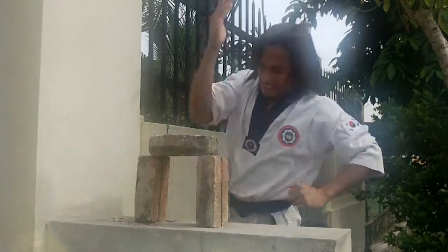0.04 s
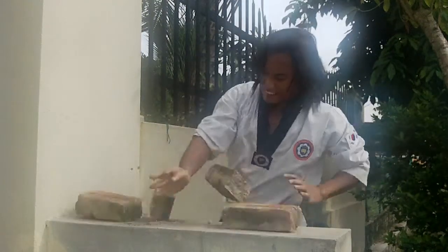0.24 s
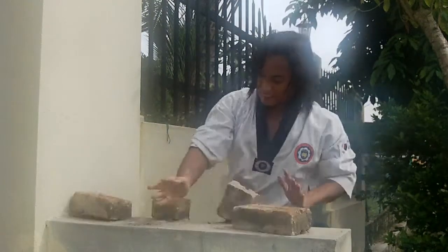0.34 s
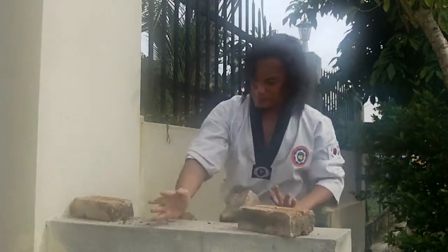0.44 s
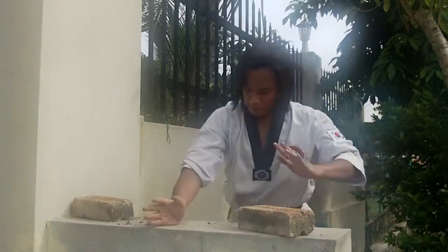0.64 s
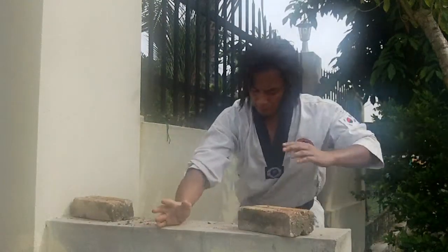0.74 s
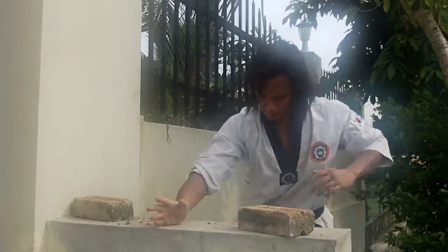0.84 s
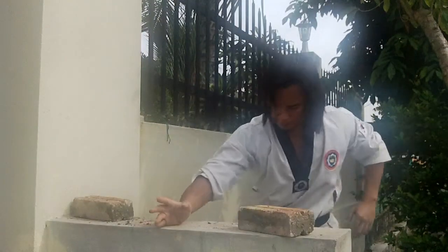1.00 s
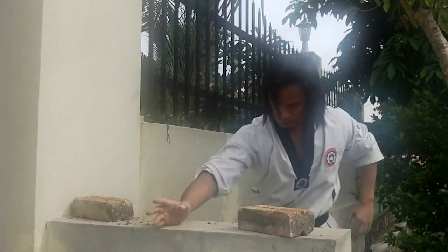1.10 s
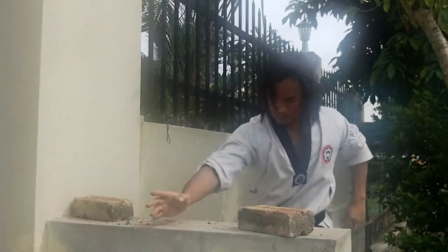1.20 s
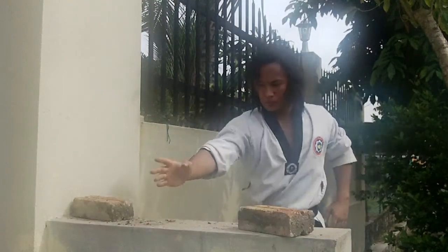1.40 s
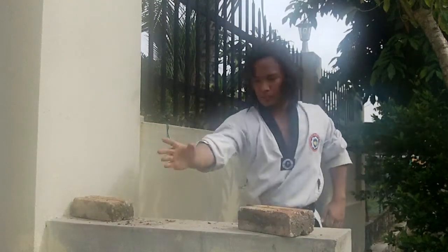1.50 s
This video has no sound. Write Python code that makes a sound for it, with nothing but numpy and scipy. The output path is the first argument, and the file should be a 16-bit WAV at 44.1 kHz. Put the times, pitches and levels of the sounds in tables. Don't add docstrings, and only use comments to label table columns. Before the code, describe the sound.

Bricks break with a dull snap from a hand chop, clink together and slam hard onto a concrete ledge; grit showers, then a piece thuds to the ground, jingling scrap metal, in a quiet yard, close microphone.

```python
import sys
import numpy as np
from scipy import signal
from scipy.fft import rfft, irfft
from scipy.io import wavfile
from scipy.ndimage import map_coordinates

SR = 44100
rng = np.random.default_rng(int(sys.argv[2]) if len(sys.argv) > 2 else 0)


def ratio_of_db(decibels):
    return 10 ** (np.asarray(decibels, float) / 20)


def transcribe(signal):
    frames = np.atleast_2d(signal).T
    limited = np.clip(frames, -1, 1)
    pcm = np.round(limited * 32767).astype(np.int16)
    wavfile.write(sys.argv[1], SR, pcm)


N = 68355


def unit(x):
    return x / np.sqrt(np.mean(x ** 2) + 1e-20)


def along(points, hz):
    f, v = np.transpose(points)
    return np.interp(np.log(hz + 1), np.log(f + 1), v)


def wobble(rate, size=N):
    knots = rng.standard_normal(size // 8 + 9)
    return map_coordinates(knots, [np.arange(size) * min(rate / SR, 1 / 8)])


def noise(points, size=N):
    hz = np.fft.rfftfreq(size, 1 / SR)
    band = (hz > points[0][0] / 2) & (hz < 15900)
    spectrum = rfft(rng.standard_normal(size)) * ratio_of_db(along(points, hz))
    return unit(irfft(spectrum * band, size))


def add(out, s, x):
    i = max(round(s * SR), 0)
    out[i:i + len(x)] += x[:N - i]


# pitch_hz, level_db
CRACK_COLOUR = [(100, 12), (800, -14), (3000, -0.5), (6000, -5), (11000, -9.5), (16000, -34)]
# pitch_hz, level_db
RUBBLE_COLOUR = [(120, -5), (400, 3), (1500, -8.5)]
CRACK_T60_S, RUBBLE_T60_S, RUBBLE_DB = 0.037, 0.11, -17
HARD_RISE_S, SOFT_RISE_S = 0.00055, 0.0025
BLUR_SHARE = 0.12


def struck(modes, hits, rise_s, fastest_blur=140):
    out = np.zeros(N)
    t = np.arange(SR // 4) / SR
    hz, db, t60 = np.transpose(modes)[..., None]
    crumbling = RUBBLE_COLOUR + [(2 * RUBBLE_COLOUR[-1][0], -60)]
    for s, ring_db, crack_db in hits:
        uneven_db = 2 * rng.standard_normal((len(modes), 1))
        wander = np.array([wobble(min(BLUR_SHARE * f, fastest_blur), size=len(t)) for f in hz[:, 0]])
        ring = ratio_of_db(db + uneven_db - 60 * t / t60) * np.sin(2 * np.pi * hz * t + wander)
        crack = ratio_of_db(crack_db - 60 * t / CRACK_T60_S) * noise(CRACK_COLOUR, size=len(t))
        loose = ratio_of_db(RUBBLE_DB - 60 * t / RUBBLE_T60_S) * noise(crumbling, size=len(t))
        press = 1 - np.exp(-t / rise_s)
        add(out, s, ratio_of_db(ring_db) * (ring.sum(0) + loose) * press + crack)
    return out


# pitch_hz, level_db, t60_s
SLAB = [(92.6, -1, 0.18), (227.4, -7, 0.088), (294, 6.5, 0.04), (377, 5, 0.036), (550, 2.5, 0.028),
        (700, 2, 0.025), (1167, -7, 0.071), (1315, -9.5, 0.076), (2300, -4, 0.0036)]
# start_s, ring_db, crack_db
CHOP = [
    (.1445, -11, -11),
]


def chop():
    return struck(SLAB, CHOP, SOFT_RISE_S)


# pitch_hz, level_db, t60_s
HALF = [(1356, -8.5, 0.037), (3128, 1.5, 0.051), (3115, -17, 0.2), (5170, -4, 0.037)]
OTHER_HALF = [(356, -4, 0.029), (810, -19, .03), (1314, -3.5, 0.0076), (2753, 4.5, .025), (2860, -15, 0.16),
              (3040, 2.5, 0.014)]
# start_s, ring_db, crack_db
HALF_HITS = [(.187, -11, -20), (0.2391, -41, -37.5), (0.344, -24, -38.5), (.426, -30.5, -50),
             (.478, -24.5, -28.5)]
OTHER_HITS = [(0.2690, -25, -31.5), (0.2730, -13, -24.5), (0.3409, -9.5, -29), (0.391, -35.5, -61),
              (0.4632, -27, -26)]


def halves():
    return struck(HALF, HALF_HITS, HARD_RISE_S) + struck(OTHER_HALF, OTHER_HITS, HARD_RISE_S)


# pitch_hz, level_db, t60_s
UPRIGHT = [(250, -11, 0.055), (502, -17, 0.095), (713, 1.5, 0.029), (995, -2.5, 0.015), (1175, -7, 0.03),
           (1353, 3.5, 0.028), (1425, -6, 0.028), (2299, -8.5, 0.028), (3124, -2.5, 0.041)]
UPRIGHT_EDGE = [(2700, -7.5, .03), (3105, 0.5, .035), (3168, -3.5, .04), (3843, -4, 0.053)]
UPRIGHT_FACE = [(269, -12, 0.0268), (425, 2.5, 0.02), (657, 0.5, 0.023), (739, -0.5, 0.015),
                (802.6, -5.5, 0.051), (991, -6.5, 0.013), (1624, -16, .02), (2550, -8, .015)]
# start_s, ring_db, crack_db
UPRIGHT_HITS = [(0.3192, -6, -20), (.320, 0.5, -9.5), (.328, -3, -40), (0.343, -11.5, -41),
                (0.354, -23, -39.5), (0.377, -29.5, -43.5), (0.297, -31.5, -50)]
EDGE_HITS = [
    (0.325, -3, -12.5),
]
FACE_HITS = [(0.334, -0.5, -25), (.3405, -8, -29), (.351, -31, -49), (.362, -32, -31.5), (.433, -22, -42),
             (.4412, -15, -37), (.453, -22.5, -58)]


def upright():
    body = struck(UPRIGHT, UPRIGHT_HITS, HARD_RISE_S)
    edge = struck(UPRIGHT_EDGE, EDGE_HITS, HARD_RISE_S)
    face = struck(UPRIGHT_FACE, FACE_HITS, HARD_RISE_S)
    return body + edge + face


# pitch_hz, level_db, t60_s
KERB = [(67, -9.5, 0.23), (125.4, -2, 0.24), (191.2, -11.5, 0.24), (436, -3.5, 0.029), (677, 0, 0.05),
        (801, 0, .03), (1063, -5, 0.021), (1311, -3.5, 0.089), (1845, -13, 0.023), (2820, -14, 0.019)]
GROUND = [(86.6, -8.5, 0.25), (140.2, -6.5, 0.1), (186.8, -10.5, 0.14), (281, -3.5, 0.062),
          (410, 4.5, 0.024), (498, -5, 0.04), (668, -10.5, 0.024), (810, -13.5, 0.024), (1278, -18, 0.051)]
TUMBLING = [(98, -5, .15), (146, -6.5, 0.16), (267, -2, 0.078), (424.5, 1.5, 0.043), (522, -1, 0.013),
            (720, -2, 0.021), (880, -8, .03), (1310, -17.5, 0.042)]
LEDGE = [(70, -12, 0.1), (103.5, 6, 0.42)]
# start_s, ring_db, crack_db
KERB_HITS = [(0.853, -20, -55), (0.856, -15.5, -34), (0.883, -32, -52), (1.539, -34, -53)]
GROUND_HITS = [(.417, -26, -24.5), (0.424, -20.5, -44.5), (0.431, -25, -47.5), (0.467, -20.5, -60),
               (0.488, -31, -58), (0.511, -39.5, -64), (0.995, -16, -46), (1.0, -16.5, -23.5),
               (1.021, -23.5, -40), (1.042, -29.5, -61), (1.09, -35, -46.5)]
TUMBLING_HITS = [(1.174, -32, -67), (1.225, -28.5, -48), (1.243, -35, -47.5), (1.263, -31.5, -61),
                 (1.272, -21.5, -64), (1.296, -21, -55), (1.304, -29, -67), (1.313, -28, -60),
                 (1.325, -30, -49), (1.349, -39.5, -61)]
LEDGE_HITS = [(0.27, -32, -94.5), (0.321, -28.5, -76), (0.423, -47, -78), (0.488, -35.5, -47)]


def drop_and_tumble():
    bodies = [(KERB, KERB_HITS), (GROUND, GROUND_HITS), (TUMBLING, TUMBLING_HITS), (LEDGE, LEDGE_HITS)]
    return sum(struck(modes, hits, SOFT_RISE_S) for modes, hits in bodies)


# pitch_hz, level_db, t60_s
SCRAP = [(5980, -12, 0.13), (8000, 3, 0.055), (9950, -8.5, 0.12), (11770, -14, 0.024)]
SCRAP_RIM = [(6100, -0.5, 0.16), (6800, -15, .06), (7100, -10, .05)]
# start_s, ring_db, crack_db
SCRAP_HITS = [(.855, -25, -33), (.875, -36, -75), (.893, -32.5, -61), (0.911, -38, -63), (.935, -50, -63),
              (1.005, -57, -68), (1.305, -54, -60)]
RIM_HITS = [(.706, -41, -66), (0.751, -60, -48), (.891, -35, -72), (0.915, -56, -76), (0.935, -53.5, -70),
            (1.234, -60, -70), (1.36, -54, -70)]


def metal_scrap():
    plate = struck(SCRAP, SCRAP_HITS, HARD_RISE_S, fastest_blur=420)
    return plate + struck(SCRAP_RIM, RIM_HITS, HARD_RISE_S, fastest_blur=420)


# start_s, level_db, pitch_hz
CHIPS = [(.1440, -15.5, 13100), (.2375, -35.5, 9500), (.254, -46, 9000), (0.261, -30.5, 8200),
         (.2975, -44, 10000), (0.335, -28, 6000), (0.3402, -18.5, 6100), (.4035, -29, 5000),
         (.404, -28, 8600), (.424, -32, 9000), (0.4418, -29.5, 2530), (.499, -31.5, 6900),
         (.523, -32, 1064), (0.669, -43.5, 3500), (.732, -33.5, 3000), (0.837, -37.5, 9800),
         (.857, -23, 2100), (1.540, -31, 1120)]


def chips():
    out = np.zeros(N)
    t = np.arange(SR // 32) / SR
    for s, db, hz in CHIPS:
        colour = [(hz / 3, -14), (hz, 0), (hz * 2, -30)]
        add(out, s, ratio_of_db(db - 60 * t / .014) * noise(colour, size=len(t)))
    return out


# pitch_hz, level_db
GRIT_COLOUR = [(200, -2), (1500, -12), (3000, 1), (5000, -8), (12000, -42.5)]
# pitch_hz, level_db
DUST_COLOUR = [(3000, -21), (7000, 0), (10000, -7.5), (15000, -16)]
# start_s, rise_s, t60_s, level_db, dust_share (0-1)
GRIT = [(0.143, 0.001, 0.8, -35.5, 0.76), (.32, 0.0043, 0.33, -32.5, 0.44),
        (.415, 0.0034, 0.29, -39.5, 0.66), (.48, .03, 1, -48.5, 0), (.705, 0.022, 0.5, -44, 0.66),
        (0.857, .005, 0.24, -33, 0.54), (1.004, 0.013, 0.26, -34.5, 0.49),
        (1.227, 0.0053, 0.15, -48.5, 0.74), (1.299, 0.01, 0.34, -41.5, 0.8), (1.449, 0.16, .3, -48.5, 0)]


def spiky(colour):
    return unit(ratio_of_db(2 * wobble(700) + 1.5 * wobble(60)) * noise(colour))


def grit():
    t, out = np.arange(N) / SR, np.zeros(N)
    crumbs, dust = spiky(GRIT_COLOUR), spiky(DUST_COLOUR)
    for s, rise, t60, db, dust_share in GRIT:
        swell = np.clip((t - s) / rise, 0, 1)
        flow = ratio_of_db(db - 60 * np.clip(t - s - rise, 0, None) / t60) * swell
        fine = np.clip(dust_share, 0, 1)
        out += flow * ((1 - fine) * crumbs + fine * dust)
    return out


# pitch_hz, t60_s
WALL = [(100, 0.67), (400, 0.28), (1300, 0.36), (3000, 0.36), (8000, 0.05), (15000, 0.021)]
WALL_DB, WALL_DELAY_S = -17, .004
SCATTER, SCATTER_HZ = .7, 600


def wall(x):
    scattered = x * (1 - SCATTER + SCATTER * wobble(SCATTER_HZ))
    _, t, z = signal.stft(rng.standard_normal(SR // 2), SR, nperseg=256)
    decay = ratio_of_db(-60 * t / along(WALL, hz=_)[:, None])
    tail = signal.istft(z * decay, SR, nperseg=256)[1]
    late = np.pad(scattered, (round(WALL_DELAY_S * SR), 0))
    return ratio_of_db(WALL_DB) * signal.fftconvolve(late, tail / np.linalg.norm(tail))[:N]


# start_s, length_s, pitch_hz, level_db
BIRDS = [(0, 0.037, 2444, -47.5), (.05, 0.037, 2394, -49), (.1, 0.056, 2400, -55), (0.737, 0.06, 5930, -50),
         (.712, 0.073, 3480, -39), (.725, .04, 2900, -47), (.735, 0.066, 7100, -57.5), (.8, .04, 7400, -47),
         (.822, 0.038, 9600, -52), (1.35, .025, 2700, -58), (1.46, .09, 3027, -53), (1.483, .06, 3350, -51)]
# start_s, length_s, pitch_hz, level_db
WHISTLE = [
    (1.368, .09, 3690, -58),
    (1.443, .06, 3710, -53),
    (1.498, .06, 3700, -51),
    (1.372, .065, 2800, -56),
]
BIRD_FLUTTER, WHISTLE_FLUTTER, FLUTTER_HZ = .5, .15, 300


def birds():
    out, size = np.zeros(N), SR // 8
    notes = [(*b, BIRD_FLUTTER) for b in BIRDS] + [(*w, WHISTLE_FLUTTER) for w in WHISTLE]
    for s, length, hz, db, flutter in notes:
        progress = np.clip(np.arange(size) / (length * SR), 0, 1)
        swell = np.sin(np.pi * progress) ** .5
        pitch = hz * (1 + .005 * wobble(150, size=size))
        level = ratio_of_db(db + 2.5 * wobble(140, size=size))
        breath = 1 - flutter + flutter * wobble(FLUTTER_HZ, size=size)
        add(out, s, level * breath * swell * np.sin(2 * np.pi * np.cumsum(pitch) / SR))
    return out


# pitch_hz, level_db (per Hz)
HISS = [(88, -24), (150, -13), (675, -11), (1340, -13), (2100, -20.5), (2400, -13), (3770, -15),
        (9000, -19), (16000, -28)]
# pitch_hz, level_db (per Hz)
RUMBLE = [(20, -28.5), (40, 5.5), (62, 16), (100, -9.5), (160, -11.5), (300, -11.5), (500, -35.5)]
HISS_DB, RUMBLE_DB, WHINE_DB, WHINE_HZ = -54.5, -43.5, -71, 12000


def air():
    rumble = ratio_of_db(RUMBLE_DB + 4.9 * wobble(1.1)) * noise(RUMBLE)
    hiss = ratio_of_db(HISS_DB + 1.1 * wobble(1.8)) * noise(HISS)
    phase = 2 * np.pi * WHINE_HZ * np.arange(N) / SR + wobble(40)
    return rumble + hiss + ratio_of_db(WHINE_DB) * np.sin(phase)


def scene():
    bricks = chop() + halves() + upright() + drop_and_tumble() + metal_scrap()
    near = bricks + chips() + birds()
    return np.tile(near + wall(near) + grit() + air(), (2, 1))


# pitch_hz, level_db
APART = [(60, -40), (600, -36), (2500, -31), (5000, -25), (15000, -15)]
SIDE_HISS_DB = -65.5


def channel_difference(x):
    hz = np.fft.rfftfreq(N, 1 / SR)
    parted = irfft(rfft(x * wobble(900)) * ratio_of_db(along(APART, hz)), N)
    return parted + ratio_of_db(SIDE_HISS_DB) * noise([(3000, -10.5), (14000, -11.0)])


def top_cut(x):
    return signal.sosfilt(signal.butter(12, 16470, fs=SR, output="sos"), x)


TOP, KNEE = 1.02, 6
TOP_HZ, LOW_CUT_HZ = 16470, 45


def record(dry):
    x = dry / (1 + np.abs(dry / TOP) ** KNEE) ** (1 / KNEE)
    hz = np.fft.rfftfreq(N, 1 / SR)
    low_cut = hz ** 2 / (hz ** 2 + LOW_CUT_HZ ** 2)
    x = irfft(rfft(x) * (hz < TOP_HZ) * low_cut, N)
    mix = x + channel_difference(x[0]) * [[1], [-1]]
    return top_cut(mix)


dry = scene()
out = record(dry)
transcribe(out)
```